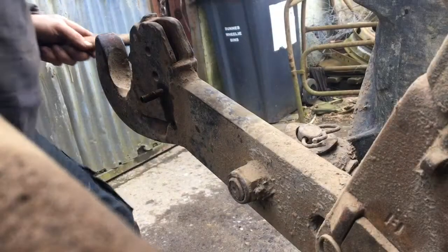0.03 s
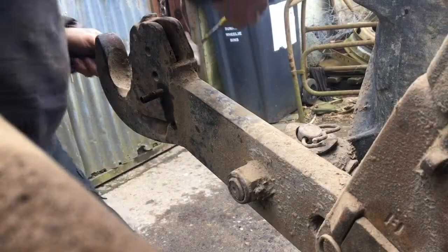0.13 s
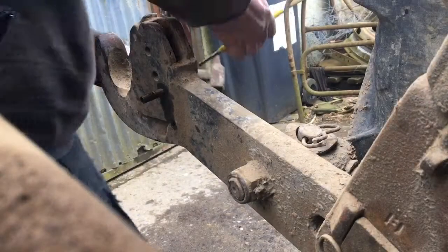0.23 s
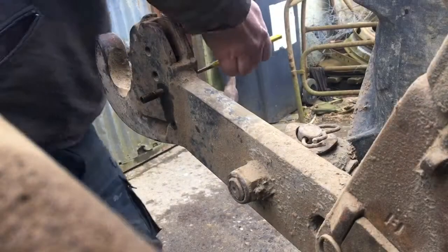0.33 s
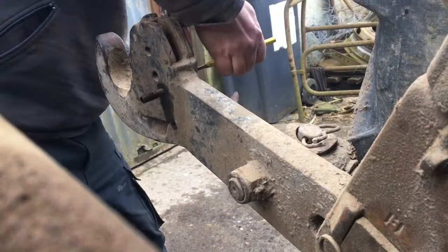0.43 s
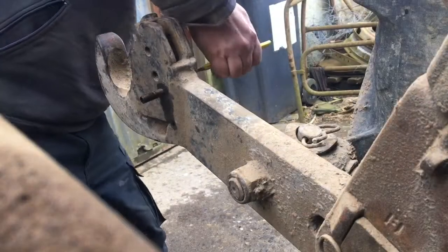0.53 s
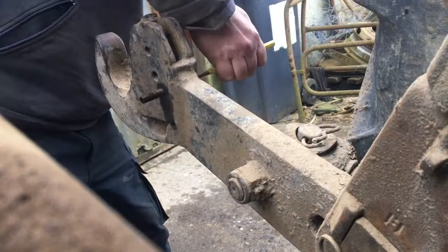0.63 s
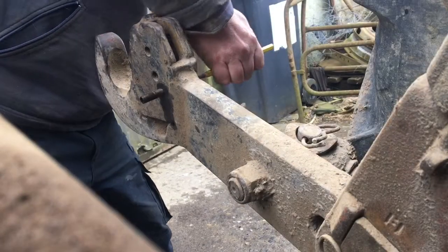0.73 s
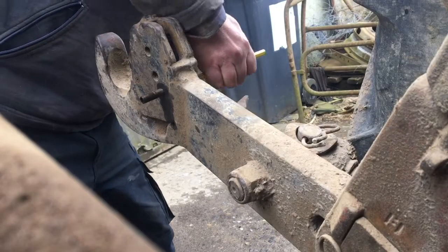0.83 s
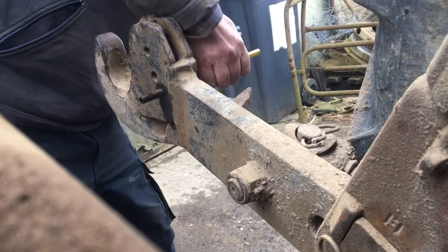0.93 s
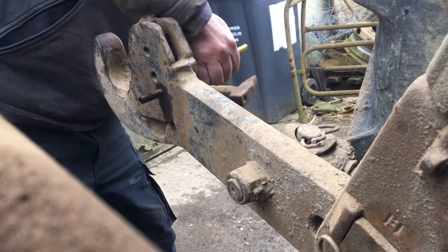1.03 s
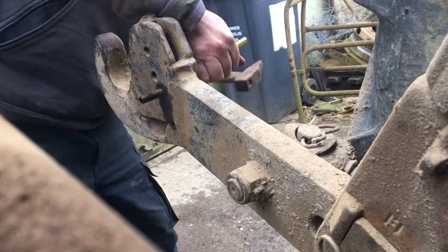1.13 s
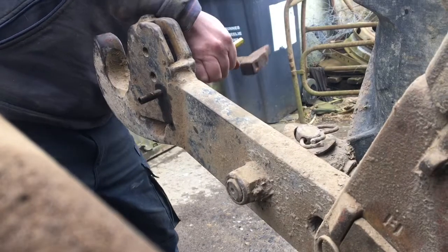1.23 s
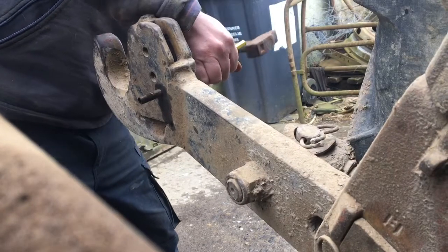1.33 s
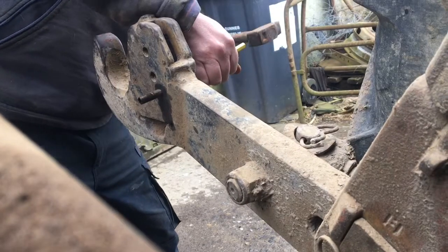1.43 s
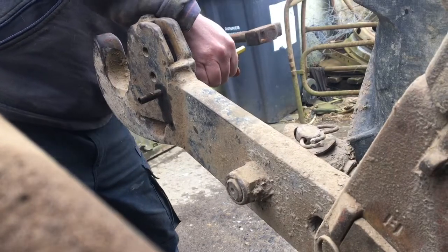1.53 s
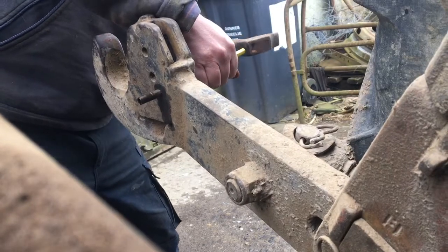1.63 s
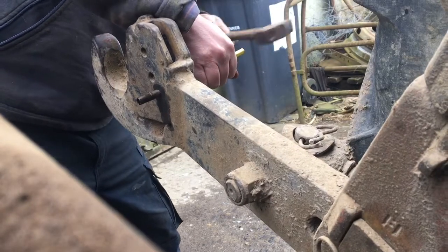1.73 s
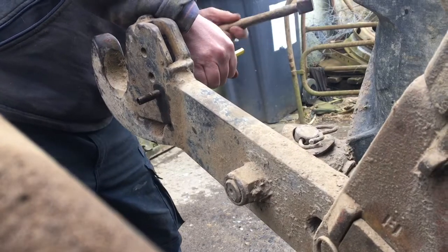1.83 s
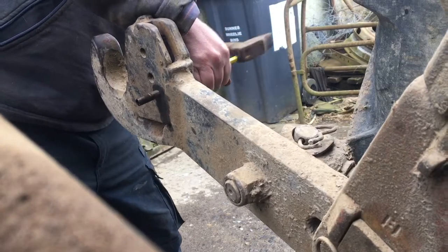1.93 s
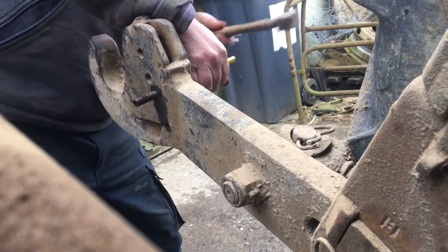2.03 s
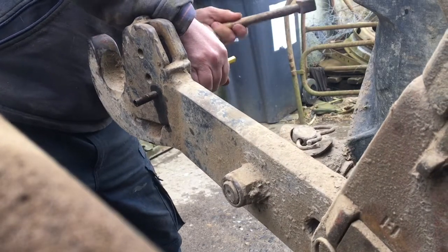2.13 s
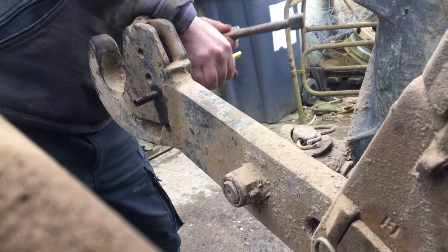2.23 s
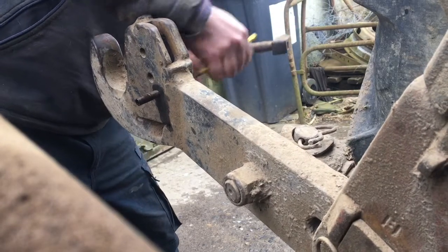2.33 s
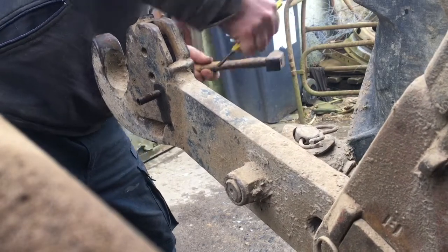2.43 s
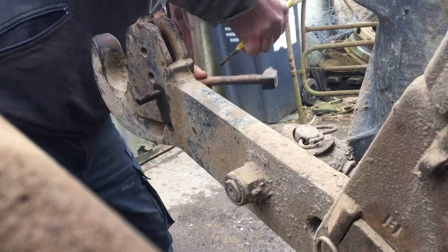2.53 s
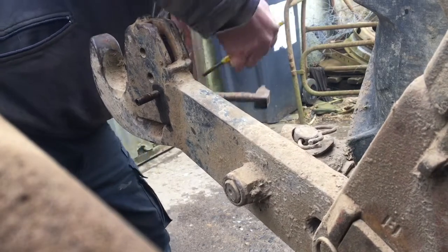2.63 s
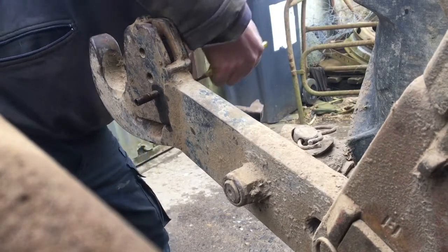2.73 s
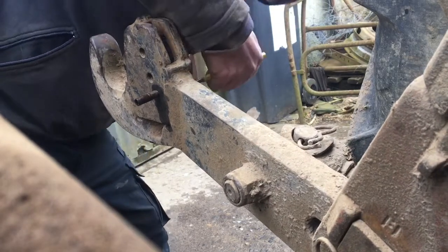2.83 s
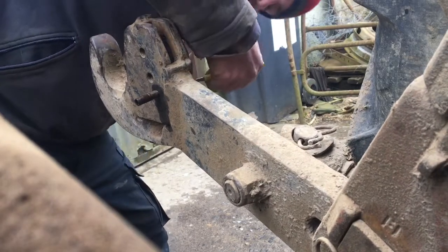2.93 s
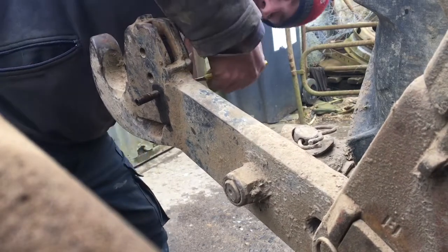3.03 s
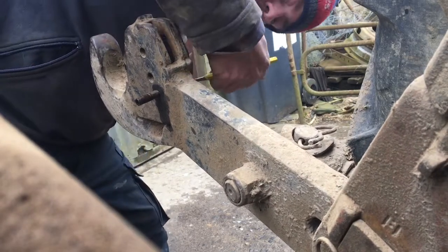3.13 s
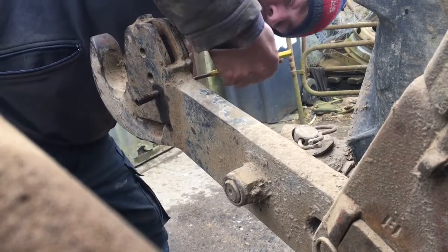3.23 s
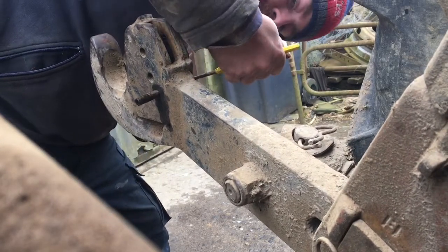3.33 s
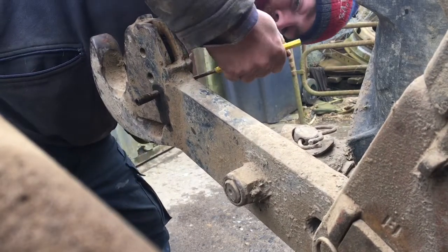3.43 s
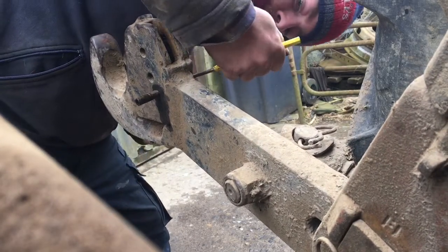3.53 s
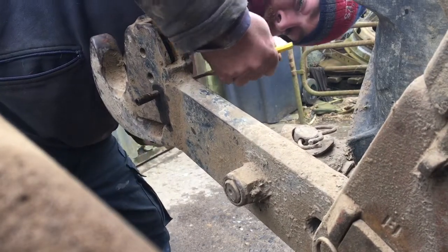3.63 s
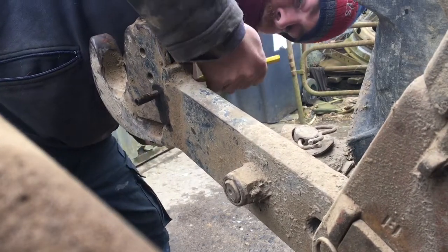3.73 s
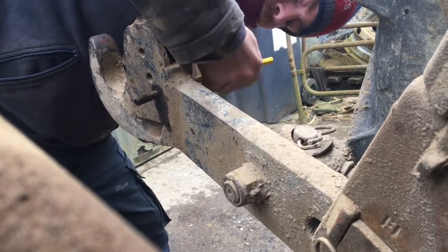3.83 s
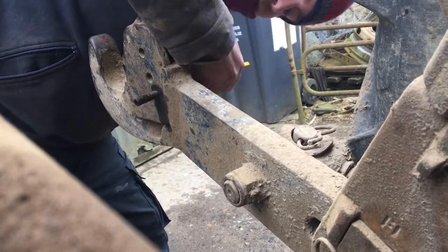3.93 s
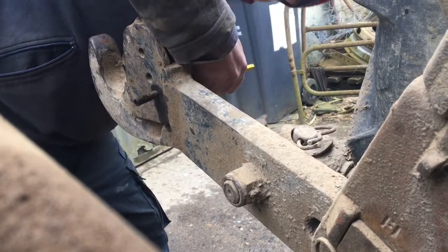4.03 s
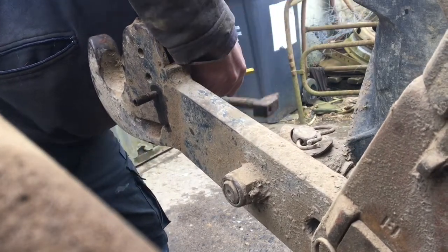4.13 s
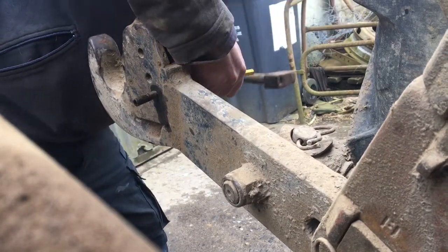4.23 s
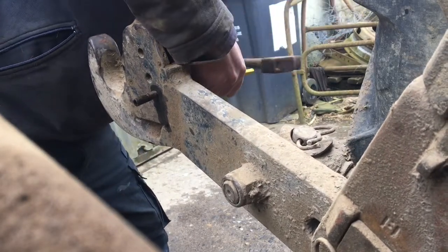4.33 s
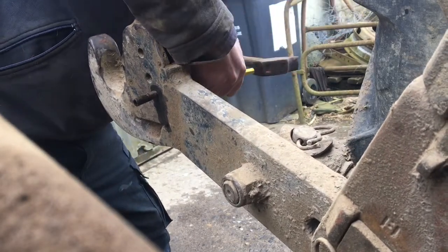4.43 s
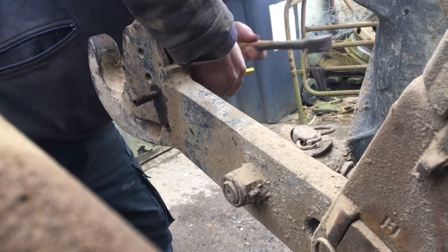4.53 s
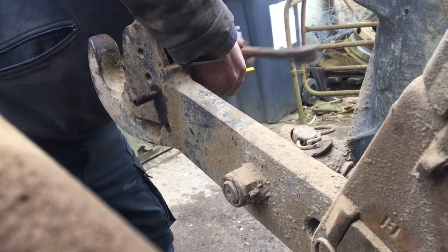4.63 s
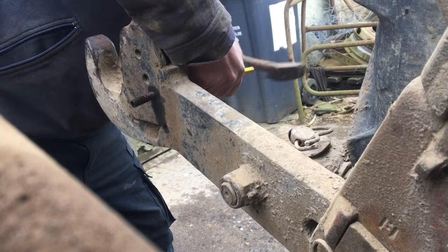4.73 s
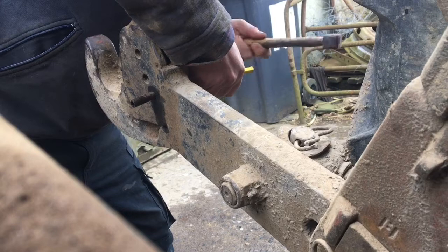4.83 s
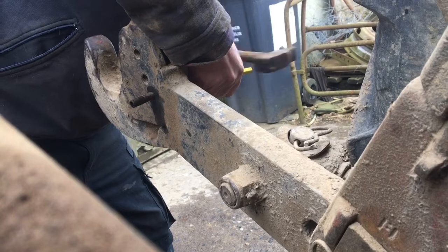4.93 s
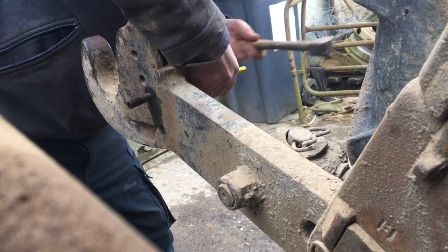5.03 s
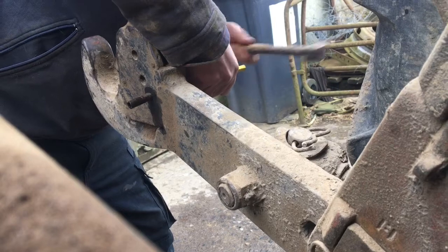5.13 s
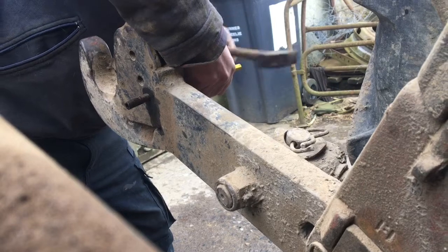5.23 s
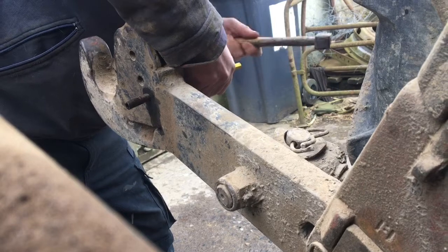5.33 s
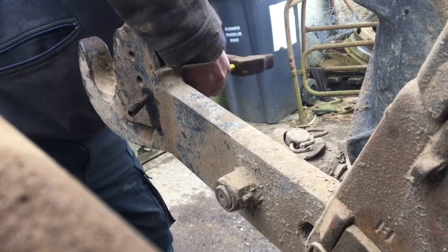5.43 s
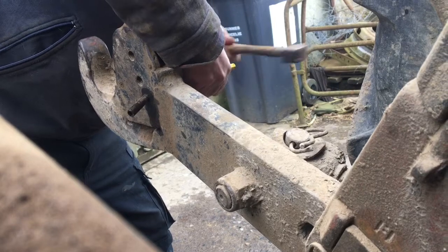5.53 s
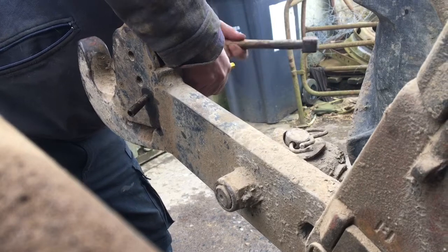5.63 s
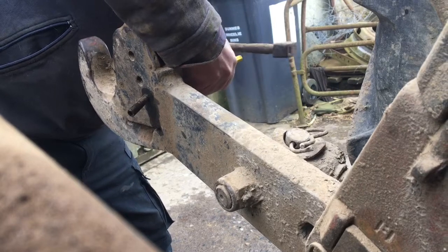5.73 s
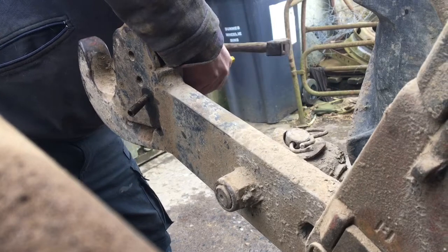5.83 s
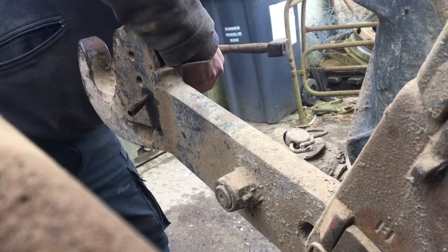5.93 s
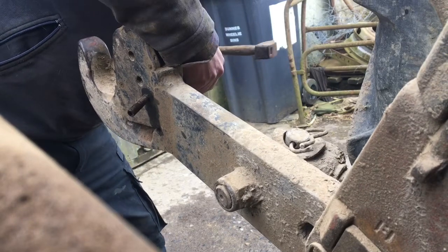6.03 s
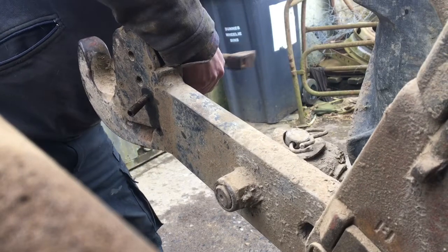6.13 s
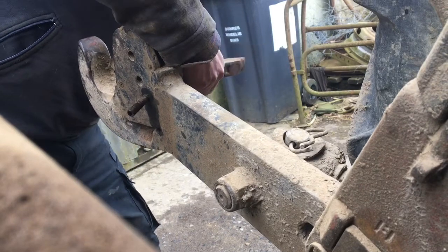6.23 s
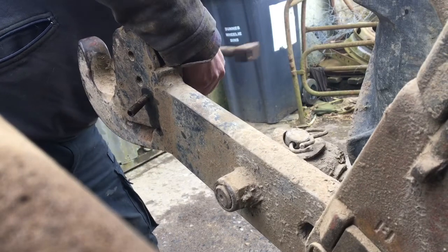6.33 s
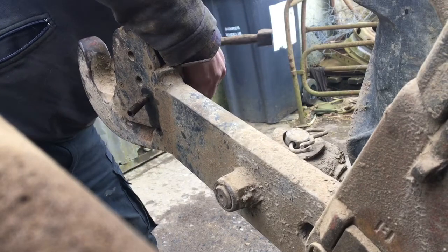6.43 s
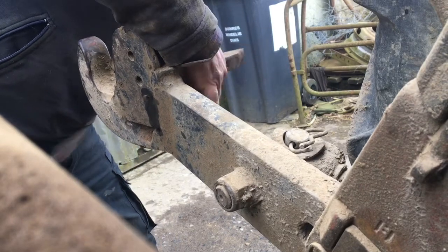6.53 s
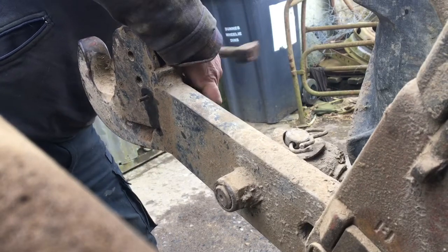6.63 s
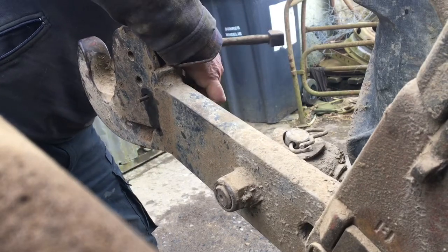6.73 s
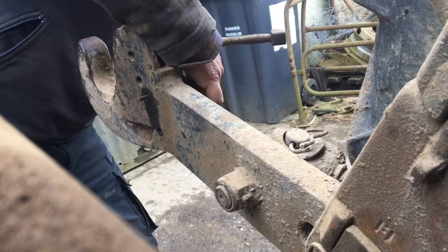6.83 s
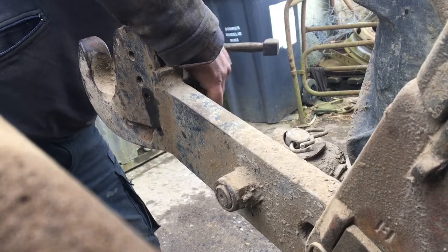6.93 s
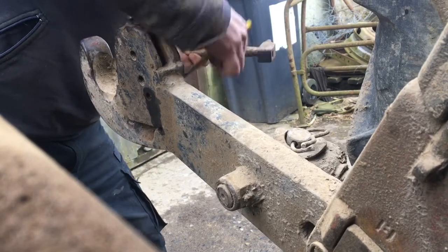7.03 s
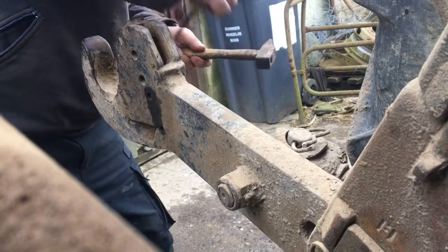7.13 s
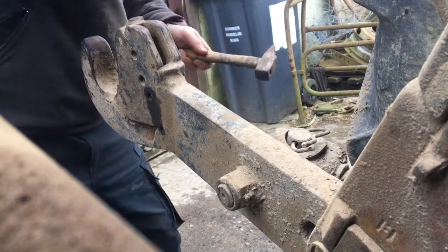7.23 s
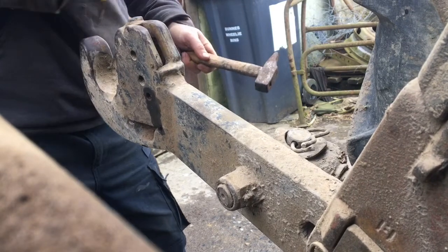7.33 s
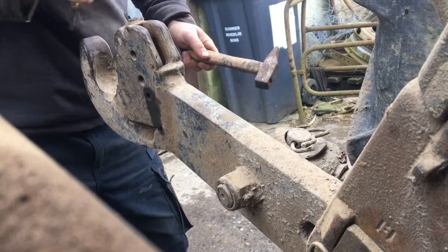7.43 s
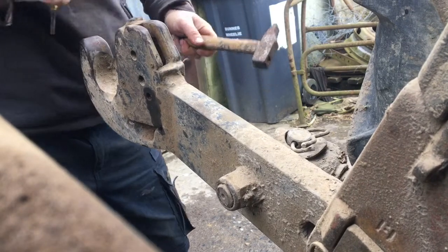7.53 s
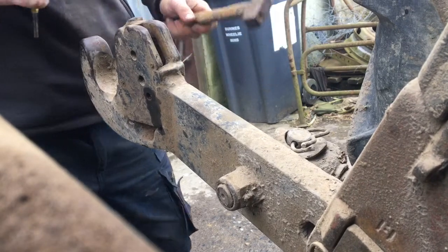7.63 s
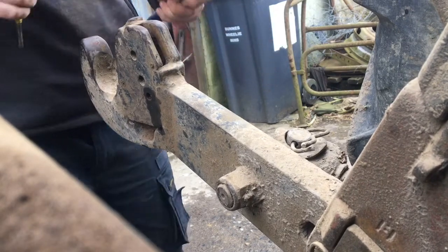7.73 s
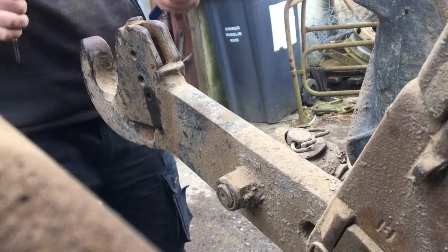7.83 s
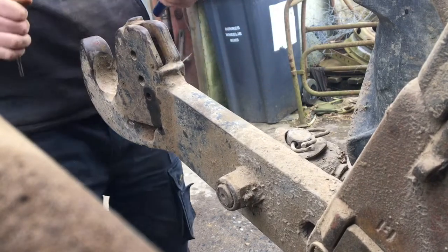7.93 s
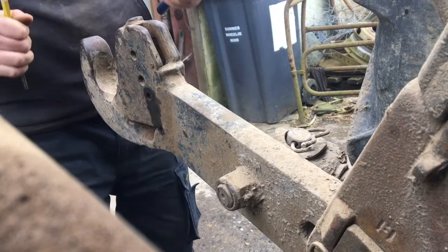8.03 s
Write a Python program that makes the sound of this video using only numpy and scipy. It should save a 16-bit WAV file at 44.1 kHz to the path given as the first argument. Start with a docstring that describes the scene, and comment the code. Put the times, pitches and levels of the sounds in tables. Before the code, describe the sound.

Close in an open workshop, a low distant engine hums under soft air. A boot thuds and a jacket rustles, a steel punch clicks and scrapes, and two bright hammer blows land. After more scraping come four heavier clangs, the first three juddering and ringing, then two lighter, looser knocks. The freed pin tinkles across concrete, and cloth rustles again. Steel sounds carry a short wall echo.

```python
"""A steel pin is driven out of a tractor's lift arm with hammer and punch, in an open workshop.
From the start an engine hums far off (wandering sine, low rumble) in soft air noise; a boot thuds, a jacket rustles
(grainy noise). The punch is set and scraped into the bore (noise clatter, damped modes); faint whistles fall in pitch.
Blows judder the pin and ring the arm, longest when tight; late on the freed pin bounces on concrete with a high tinkle,
and the jacket rustles again. The steel sounds gain a wall echo and a diffuse tail."""
import sys
import numpy as np
from scipy import signal
from scipy.fft import rfft, irfft, next_fast_len
from scipy.io import wavfile
from scipy.ndimage import uniform_filter1d

SR = 44100
rng = np.random.default_rng(int(sys.argv[2]) if len(sys.argv) > 2 else 0)


def file_out(sig):
    """Save sig as 16-bit WAV at sys.argv[1]."""
    # one column per channel
    cols = np.atleast_2d(sig).T
    # limit, then scale
    lim = np.clip(cols, -1, 1)
    pcm = np.round(lim * 32767).astype(np.int16)
    wavfile.write(sys.argv[1], SR, pcm)


N = 356724
TIME_S = np.arange(N) / SR
AGE_S = TIME_S[:SR * 3 // 5]   # time since a contact

# analysis bands: low_hz, high_hz
BANDS_HZ = [(70, 500), (500, 1600), (1600, 4500), (4500, 9000), (9000, 16000)]

# distant engine, firing line: time_s, level_db
ENGINE_LINE = [(0, -69), (0.7, -55.5), (2, -52), (2.6, -47.5), (3.5, -44.5), (3.9, -53), (5.4, -54),
               (5.85, -43), (6.3, -53.5), (6.8, -52), (7.3, -45), (8.09, -46)]
# engine rumble level: time_s, level_db
RUMBLE_LEVEL = [(0, -49.5), (2.4, -50), (4.3, -53), (5.6, -47.5), (8.09, -49)]
# engine rumble spectrum: freq_hz, level_db
RUMBLE_SPECTRUM = [(20, -38), (33, -8.5), (48, 5), (62, 2.5), (80, -5), (102, 2.5), (125, -9.5),
                   (170, -23.5), (300, -49.5)]
ENGINE_HZ = 70.9

# air noise spectrum: freq_hz, level_db
AIR_SPECTRUM = [(130, -2), (300, -0.5), (400, -5), (600, -4), (1000, -10), (1600, -20), (2300, -20.5),
                (2900, -38), (3800, -29), (5000, -32.5), (9000, -39), (16000, -40.5)]
AIR_DB = -57   # before the band-pass

# worker shifts, jacket rubs: start_s, length_s, level_db
MOVES = [(0.195, 0.24, -57.5), (0.764, 0.26, -64), (6.705, 0.27, -66.5), (7.564, 0.087, -49.5),
         (7.79, 0.16, -66)]
# jacket spectrum: freq_hz, level_db
CLOTH_SPECTRUM = [(700, -2.5), (1300, 3.5), (2300, 7), (4500, 0.5), (9000, -3), (11000, -8), (16000, -13.5)]
MOVE_ATTACK_S, MOVE_RELEASE_SHARE, CLOTH_REST_DB = 0.042, 1, -77.5   # fade time constant as share of length
CREASES_PER_S, CREASE_S, CREASE_DB = 55, 0.0023, 7.5   # folds snap, this often at the loudest rubbing
STEP_S, STEP_DB, STEP_T60_S = .175, -45.5, 0.4   # boot on concrete

# punch set on the pin, rebounding or scraping: start_s, strength_db, scrape_s, pressure_0_to_1
TAPS = [(0.2985, -59, .019, 0.78), (.89, -54.5, 0, 0.89), (.9601, -48.5, .008, 0.38),
        (1.0977, -59, 0, 0.15), (1.623, -38.5, 0, .95), (1.638, -51.5, 0, 0.5), (1.704, -67, 0, 0.2),
        (1.838, -57, .012, 0.35), (2.225, -53.5, .026, 0.34), (2.272, -40, 0.025, 0.03),
        (2.307, -39, .035, 0), (2.7695, -56.5, 0, 1), (2.868, -62, .05, 0.04), (3.024, -73.5, .06, 0.02),
        (3.7058, -55.5, .008, 0.17), (3.846, -59, .035, 1), (3.8823, -43.5, .026, 0.4),
        (3.9206, -38.5, .008, 0.82), (4.002, -67, 0, 1), (5.6336, -56.5, 0, 0.2), (5.654, -59.5, .01, 0.5),
        (5.688, -58, 0.046, 0.77), (5.85, -67, 0, 0.7), (5.952, -70.5, 0.00092, 0.85),
        (6.995, -55, .025, 0.03), (7.733, -57, .005, 0.56), (7.785, -54, 0, 0.56)]
# tap colour, upper four bands: light_db, added_by_full_pressure_db
TAP_COLOUR = [(-18, 23), (0, -2), (-7, -1.5), (-11, -4.5)]
# punch modes: freq_hz, over_clatter_db, t60_s
PUNCH_MODES = [(1480, -6.5, .08), (2245, -3.5, .08), (2540, -11.5, .07), (3280, -6, .13),
               (4120, -1.5, 0.016), (4530, -2, 0.093), (5170, -8.5, .07), (7790, -3, 0.059),
               (8640, -6.5, 0.025), (13200, 1.5, .06)]
# mode excited by scraping: freq_hz, over_clatter_db, t60_s
SQUEAL_MODE = (4170, -5.5, .04)
SQUEAL_DB_PER_S = 400   # gain per second of scrape length
TAP_RING_DB, TAP_DAMPING_DB = 4.5, 16   # ring when light; drop at full pressure
TAP_T60_S, TAP_PRESSED_SHARE = .08, 0.75   # light clatter; share of its t60 left at full pressure

# faint gliding whistles, as of a far bird: start_s, length_s, first_hz, last_hz, level_db, roughness_pitch_share
WHISTLES = [(1.2, 0.19, 2690, 2320, -75, 0.012), (3.09, 0.14, 8100, 8000, -75, 0.0039),
            (5.758, 0.098, 7200, 6400, -65, .05), (5.774, 0.15, 8600, 7000, -72, .04)]

# hammer blows: start_s, strength_db, grip_0_to_1, hardness (-1 glancing, 1 square), favoured_hz, favoured_db
BLOWS = [(1.6012, -25.5, .2, -1.28, 5616, 0.5), (1.9215, -22.5, 0.27, 0.14, 4204, -1),
         (4.6722, -22, 0.81, -0.36, 7950, -2.5), (4.9379, -20, .8, -0.24, 2235, 0),
         (5.1823, -20.5, 0.92, 0.066, 4087, -1), (5.4279, -26, .22, 0.98, 3878, -1.5),
         (6.1861, -33, 0.16, -0.12, 5534, 1), (6.5282, -26.5, 0, 0.49, 9983, 2)]
# blow colour in each band: loose_db, added_by_full_grip_db, added_by_square_contact_db
BLOW_COLOUR = [(-16, 4.5, 1.5), (-8.5, 14, -5.5), (-5.5, 8.5, 4), (-1, -1, 0.7), (-1.5, -2.5, 6.5)]
# modes of pin and surrounding hook: freq_hz, over_clatter_db, t60_s
ARM_MODES = [(803, -9, .08), (1132, -1, .07), (1215, 6.5, .07), (1266, .5, .15), (1353, -6, .09),
             (1572, -8, .08), (2233, 5, .07), (2306, -5, .1), (2785, -8, .08), (3250, -3, .11),
             (4067, -10, .09), (5590, -11, .06), (7660, -8, .09), (7959, -5, .08), (8395, -4, .08),
             (13030, -6, .08)]
# modes of the long beam, weaker with a loose pin: freq_hz, over_clatter_db, t60_s
BEAM_MODES = [(300, -6, .14), (683, -3, .15), (1861, 3.5, .075), (2210, -33, .45), (2750, -32, .4),
              (4090, -37, .7), (7750, -36, .65)]
# low boom, independent of grip: freq_hz, over_clatter_db, t60_s
BOOM_MODE = (185, -5, 0.45)
# crowd of short-lived arm modes: freq_hz, level_db
ARM_SPECTRUM = [(120, -4.5), (230, 0.5), (480, -11.5), (750, -3.5), (1000, -2.5), (1250, 4.5), (1750, -4.5),
                (2300, 6.5), (4300, 3.5), (4800, -3), (5700, 7), (6500, -0.5), (8200, -1.5), (10500, -15),
                (13100, -7), (14300, -22), (16000, -30)]
# time the contact judders: loose_s, tight_s
BLOW_JUDDER_S = (.002, 0.017)
# clatter decay: loose_s, tight_s
BLOW_T60_S = (0.049, .072)
# ring of the modes: loose_db, tight_db
BLOW_RING_DB = (-10.5, 0)
# favoured-mode decay: loose_s, tight_s
FAVOURED_T60_S = (.045, .12)
# beam's faint hold on the favoured mode, decay: loose_s, tight_s
AFTER_RING_T60_S = (.04, .55)
AFTER_RING_DB, BEAM_GRIP = -21.5, 1.9   # BEAM_GRIP: dB of beam per dB of ring
FAVOURED_BAND_DB = 2.5   # lift of the favoured mode's whole band
HARDNESS_DB_PER_OCTAVE = 2.5   # upward tilt of a square contact's clatter

# freed pin bounces: start_s, strength_db, tinkle_db (extra in the top band)
BOUNCES = [(6.8882, -33.5, 5), (7.038, -44.5, 9.5), (7.1104, -46.5, -8), (7.22, -49.5, -4),
           (7.303, -52, -13), (7.3154, -50, 5.5), (7.3588, -41.5, -5), (7.4294, -54, -20), (7.48, -49, 0),
           (7.532, -57, -4)]
# bounce colour, upper three bands: level_db
BOUNCE_COLOUR_DB = (-4.5, -5.5, -4.5)
# loose pin modes: freq_hz, over_clatter_db, t60_s
PIN_MODES = [(3130, -5.5, 0.16), (3360, -10, .07), (3850, -16.5, .07), (4380, -4.5, 0.16), (8360, 5, 0.047),
             (9450, -20, .1), (9300, -12, 0.063), (10200, -18, 0.076)]
# crowd of short-lived pin modes: freq_hz, level_db
PIN_SPECTRUM = [(1600, -19), (2700, -15.5), (3400, -7.5), (4400, -6), (5200, -9.5), (7800, -4.5),
                (8250, -1), (8650, -6), (10000, 18.5), (10600, -6), (12000, -11), (16000, -30)]
BOUNCE_JUDDER_S = 0.0075
CLINK_RANGE_HZ, CLINK_DB, CLINK_T60_S = (2710, 4480), 0, 0.053   # new pitch each bounce

CRACK_S = .0012   # decay constant of the first contact
WAVER = .006   # line width as share of pitch: loose joints keep shifting the modes

# workshop tail in each band: t60_s, level_db
ROOM = [(.35, -6), (.22, -15), (.32, -20), (.24, -21), (.15, -19)]
WALL_ECHO_S, WALL_ECHO_DB = .018, -16.5   # first echo off the sheet wall
PEAK_TOP, CUTOFF_HZ = .9, 16300


def from_db(db):
    """Decibels to gain."""
    return 10 ** (np.asarray(db) / 20)


def rms(x):
    """Root mean square."""
    return np.sqrt(np.mean(x ** 2) + 1e-20)


def in_time(rows):
    """Each column of a curve at every sample."""
    time_s, *columns = np.transpose(rows)
    return [np.interp(TIME_S, time_s, column) for column in columns]


def noise(spectrum, size):
    """Noise of rms 1 shaped to a (freq_hz, level_db) spectrum."""
    hz, db = np.transpose(spectrum)
    padded = next_fast_len(size)
    bins_hz = np.maximum(np.arange(padded // 2 + 1) * SR / padded, 1)
    gain = from_db(np.interp(np.log(bins_hz), np.log(hz), db))
    x = irfft(rfft(rng.standard_normal(padded)) * gain, padded)[:size]
    return x / rms(x)


def drift(rate_hz):
    """Normal random values, rate_hz per second, joined by straight lines."""
    return np.interp(TIME_S * rate_hz, np.arange(4000), rng.standard_normal(4000))


def band_pass(x, band_hz):
    """Steep causal band-pass."""
    return signal.sosfilt(signal.butter(4, band_hz, "band", fs=SR, output="sos"), x)


def add(out, start_s, sound):
    """Mix a sound in at start_s."""
    at = max(round(start_s * SR), 0)
    out[at:at + len(sound)] += sound[:N - at]


def engine():
    """A firing line, slightly wandering in pitch, over low rumble noise."""
    line_db, = in_time(ENGINE_LINE)
    rumble_db, = in_time(RUMBLE_LEVEL)
    phase = 2 * np.pi * np.cumsum(ENGINE_HZ + .5 * drift(0.83)) / SR
    line = from_db(line_db) * np.sqrt(2) * np.sin(phase)
    return line + from_db(rumble_db) * noise(RUMBLE_SPECTRUM, N)


def air():
    """Steady background noise, strongest in the bass."""
    return from_db(AIR_DB) * band_pass(noise(AIR_SPECTRUM, N), (100, 16000))


def ringing(judder_s, t60_s):
    """Steel is kept going while the contact judders, then dies away."""
    return from_db(-60 * np.maximum(AGE_S - judder_s, 0) / t60_s)


def worker():
    """Grainy jacket rubbing swells, holds and fades with each move; one dull step."""
    rubbing = from_db(CLOTH_REST_DB)
    for start_s, length_s, level_db in MOVES:
        swell = np.clip((TIME_S - start_s) / MOVE_ATTACK_S, 0, 1) ** 2
        fade = np.exp(-np.maximum(TIME_S - start_s - length_s, 0) / (MOVE_RELEASE_SHARE * length_s))
        rubbing = np.maximum(rubbing, from_db(level_db) * swell * fade)
    snaps = rng.random(N) < CREASES_PER_S / SR * (rubbing / rubbing.max()) ** 2
    creases = signal.lfilter([1], [1, -np.exp(-1 / (CREASE_S * SR))], snaps)
    rubbing = rubbing * (1 + from_db(CREASE_DB) * creases)
    grain = from_db(1.6 * drift(250) + 1.5 * drift(27))
    out = rubbing * grain * noise(CLOTH_SPECTRUM, N)
    thud = noise([(60, -31), (250, 13), (700, -3), (1500, -13.5), (8000, -29)], len(AGE_S))
    add(out, STEP_S, from_db(STEP_DB) * thud * ringing(0.0063, STEP_T60_S))
    return out


def wavering(hz):
    """A sine of rms 1 whose phase wanders, which broadens its line."""
    wander = np.cumsum(rng.standard_normal(len(AGE_S))) * np.sqrt(2 * np.pi * WAVER * hz / SR)
    phase = 2 * np.pi * (hz * AGE_S + rng.random()) + uniform_filter1d(wander, size=64)
    return np.sqrt(2) * np.sin(phase)


def contact(levels_db, judder_s, t60_s, crack_db, spectrum, modes, ring_db, jolts=(1,)):
    """Steel meets steel: a crack, a crowd of short-lived modes, and clear modes that build up with the judder."""
    crowd = noise(spectrum, len(AGE_S))
    crack = np.exp(-AGE_S / CRACK_S)
    clatter = crowd * (ringing(judder_s, t60_s) * (1 - crack) + from_db(crack_db) * crack)
    build_up = 1 - np.exp(-3 * AGE_S / max(judder_s, 1 / SR))
    opening = SR // 25   # levels are set over the first 40 ms
    out = 0
    for band_hz, level_db in zip(BANDS_HZ[-len(levels_db):], levels_db):
        part = band_pass(clatter, band_hz) / rms(band_pass(crowd, band_hz))
        for hz, mode_db, mode_t60_s in modes:
            if band_hz[0] <= hz < band_hz[1]:
                envelope = build_up * ringing(judder_s, mode_t60_s)
                part = part + from_db(mode_db + ring_db) * envelope * wavering(hz)
        part = signal.fftconvolve(part, jolts)[:len(AGE_S)]
        out = out + from_db(level_db) * part / rms(part[:opening])
    return out


def slips(scrape_s):
    """Steel sticks and slips on steel about every hundredth of a second: a train of uneven jolts."""
    times_s = np.append(0, np.cumsum(rng.uniform(.004, .014, 15)))
    sizes = from_db(3.4 * rng.standard_normal(len(times_s)))
    jolts = np.zeros(len(AGE_S))
    jolts[(times_s * SR).astype(int)] = sizes * (times_s <= max(scrape_s, 0))
    return jolts


def punch():
    """Touches and scrapes of the punch hunting for the bore: ringing when light, dull and short when pressed."""
    out = np.zeros(N)
    light_db, pressed_db = np.transpose(TAP_COLOUR)
    squeal_hz, squeal_db, squeal_t60_s = SQUEAL_MODE
    for start_s, strength_db, scrape_s, pressure in TAPS:
        tap_squeal_hz = squeal_hz * (1 + .015 * rng.standard_normal())
        squeal = (tap_squeal_hz, squeal_db + SQUEAL_DB_PER_S * scrape_s, squeal_t60_s)
        levels_db = strength_db + light_db + pressure * pressed_db
        t60_s = TAP_T60_S * TAP_PRESSED_SHARE ** pressure
        ring_db = TAP_RING_DB - pressure * TAP_DAMPING_DB
        add(out, start_s, contact(levels_db, 0.0039, t60_s, crack_db=4.5, spectrum=ARM_SPECTRUM,
                                  modes=PUNCH_MODES + [squeal], ring_db=ring_db, jolts=slips(scrape_s)))
    return out


def bird():
    """Thin falling whistles, rough in pitch, that swell and fade."""
    out = np.zeros(N)
    for start_s, length_s, first_hz, last_hz, level_db, rough in WHISTLES:
        hz = np.linspace(first_hz, last_hz, int(length_s * SR))
        hz = hz * (1 + rough * drift(490)[:len(hz)])
        tone = np.sqrt(2) * np.sin(2 * np.pi * np.cumsum(hz) / SR)
        add(out, start_s, from_db(level_db) * signal.windows.tukey(len(hz), .6) * tone)
    return out


def hammer():
    """A tight pin judders long and rings the arm; a loose one gives short, bright blows."""
    out = np.zeros(N)
    loose_db, grip_db, square_db = np.transpose(BLOW_COLOUR)
    for start_s, strength_db, grip, hardness, hz, mode_db in BLOWS:
        favoured = np.array([low <= hz < high for low, high in BANDS_HZ])
        levels_db = strength_db + loose_db + grip * grip_db + hardness * square_db
        levels_db = levels_db + favoured * FAVOURED_BAND_DB
        spectrum = [(f, db + hardness * HARDNESS_DB_PER_OCTAVE * np.log2(f)) for f, db in ARM_SPECTRUM]
        judder_s, t60_s, mode_t60_s, after_t60_s = [
            loose * (tight / loose) ** grip
            for loose, tight in (BLOW_JUDDER_S, BLOW_T60_S, FAVOURED_T60_S, AFTER_RING_T60_S)]
        ring_db = BLOW_RING_DB[0] + grip * (BLOW_RING_DB[1] - BLOW_RING_DB[0])
        after_ring = (hz, mode_db + AFTER_RING_DB, after_t60_s)
        beam = [(f, db + (BEAM_GRIP - 1) * ring_db, decay_s) for f, db, decay_s in BEAM_MODES + [after_ring]]
        # boom and favoured mode: level over the clatter independent of grip
        always = [(f, db - ring_db, decay_s) for f, db, decay_s in (BOOM_MODE, (hz, mode_db, mode_t60_s))]
        add(out, start_s, contact(levels_db, judder_s, t60_s, crack_db=8.5, spectrum=spectrum,
                                  modes=ARM_MODES + beam + always, ring_db=ring_db))
    return out


def falling_pin():
    """The pin tinkles on the floor; mode levels and clink pitch vary at random with each landing."""
    out = np.zeros(N)
    for start_s, strength_db, tinkle_db in BOUNCES:
        levels_db = strength_db + np.add(BOUNCE_COLOUR_DB, (0, 0, tinkle_db))
        modes = [(hz, db + 3 * rng.standard_normal(), t60_s) for hz, db, t60_s in PIN_MODES]
        modes.append((rng.uniform(*CLINK_RANGE_HZ), CLINK_DB, CLINK_T60_S))
        add(out, start_s, contact(levels_db, BOUNCE_JUDDER_S, t60_s=0.075, crack_db=-1.5,
                                  spectrum=PIN_SPECTRUM, modes=modes, ring_db=-5.5))
    return out


def workshop(x):
    """One wall echo, and diffuse reflections with a decay for each band."""
    response = 0
    for band_hz, (t60_s, wet_db) in zip(BANDS_HZ, ROOM):
        envelope = from_db(-60 * AGE_S / t60_s) * (1 - np.exp(-AGE_S / 0.0054))
        tail = band_pass(rng.standard_normal(len(AGE_S)) * envelope, band_hz)
        share = 2 * (band_hz[1] - band_hz[0]) / SR   # of the whole spectrum
        response = response + from_db(wet_db) * tail * np.sqrt(share / np.sum(tail ** 2))
    response[round(WALL_ECHO_S * SR)] += from_db(WALL_ECHO_DB)
    return signal.fftconvolve(x, response)[:N]


def scene():
    """Near steel, the pin further off and wetter, and the dry background."""
    near, pin = hammer() + punch(), falling_pin()
    room = workshop(near + from_db(2.5) * pin)
    return (near + pin + room + worker() + engine() + bird() + air())[None]


def record(dry):
    """Round off the highest peaks; cut the top above CUTOFF_HZ."""
    rounded = dry / (1 + (dry / PEAK_TOP) ** 6) ** (1 / 6)
    return signal.sosfilt(signal.ellip(10, .1, 80, CUTOFF_HZ, fs=SR, output="sos"), rounded)


dry = scene()
out = record(dry)
file_out(out)
```